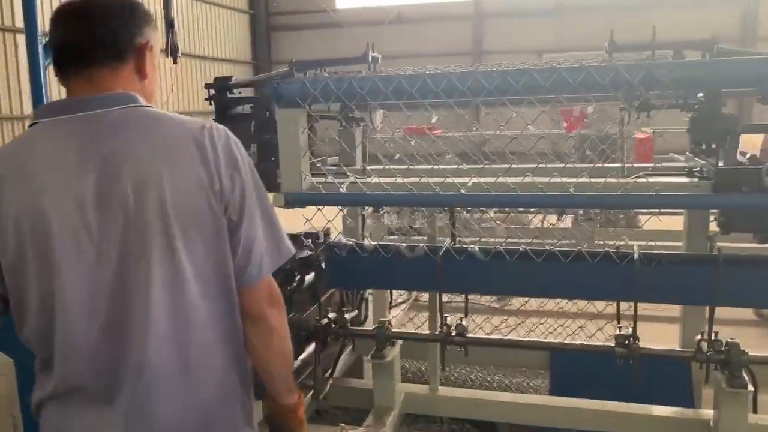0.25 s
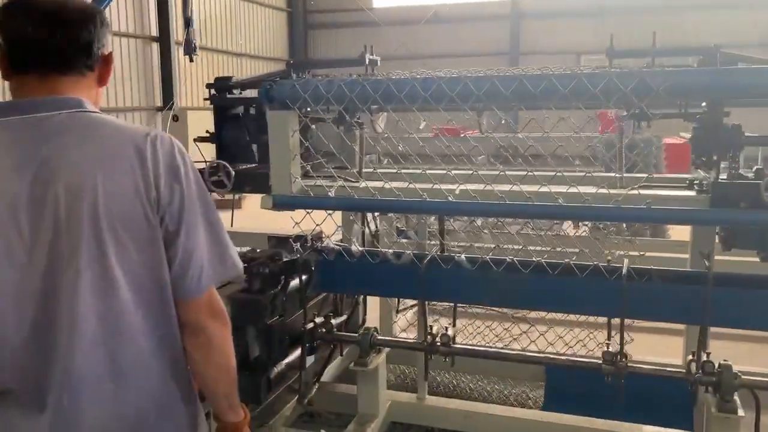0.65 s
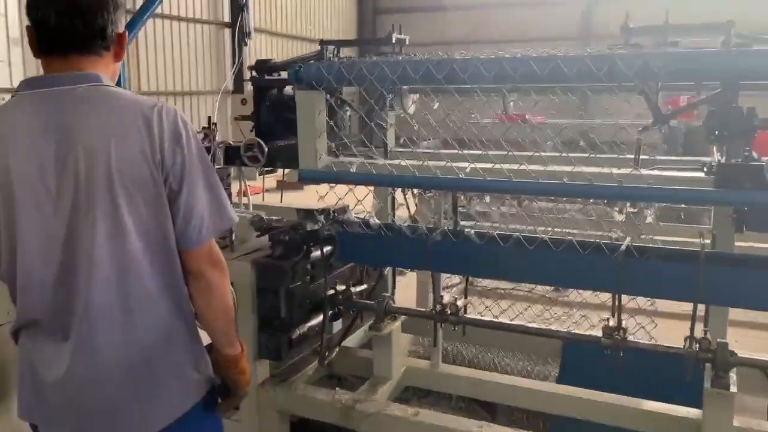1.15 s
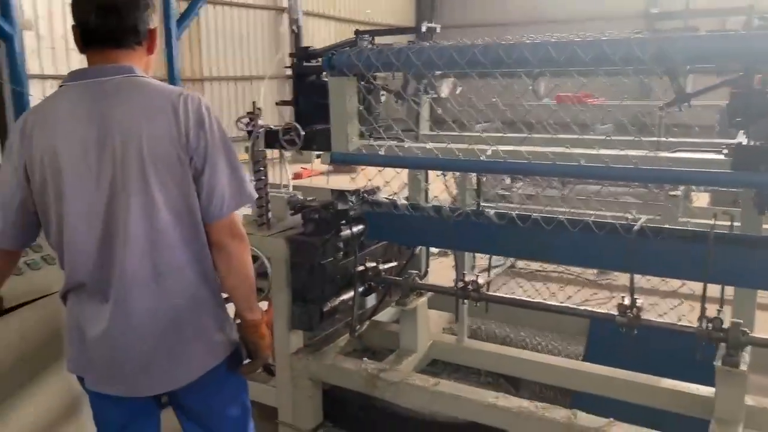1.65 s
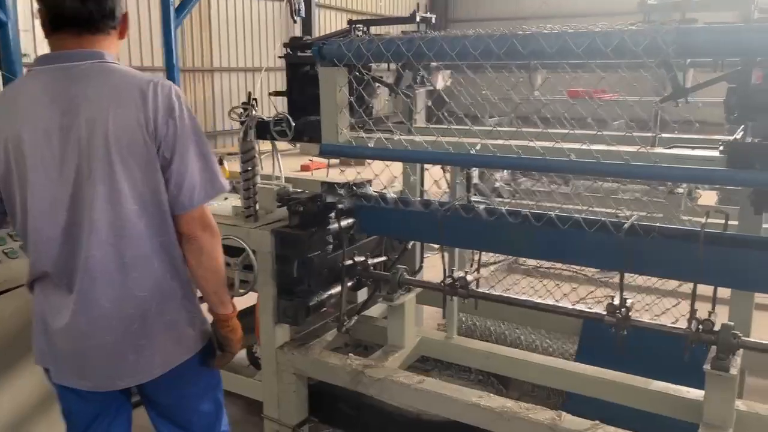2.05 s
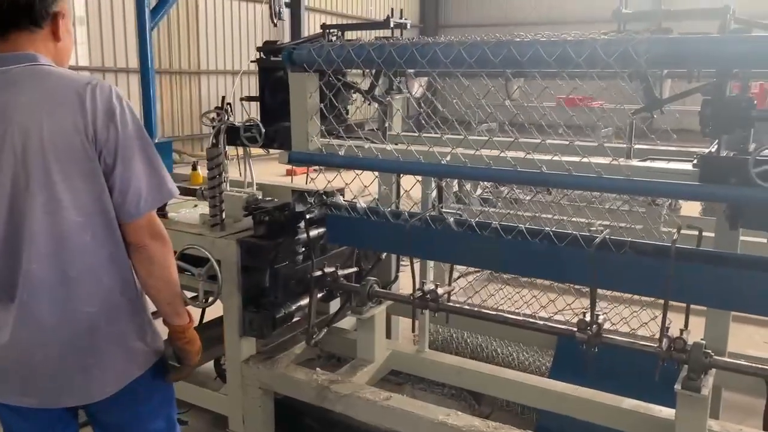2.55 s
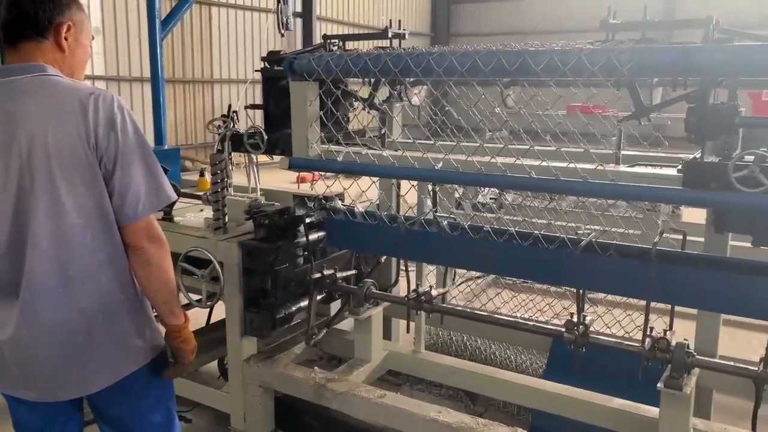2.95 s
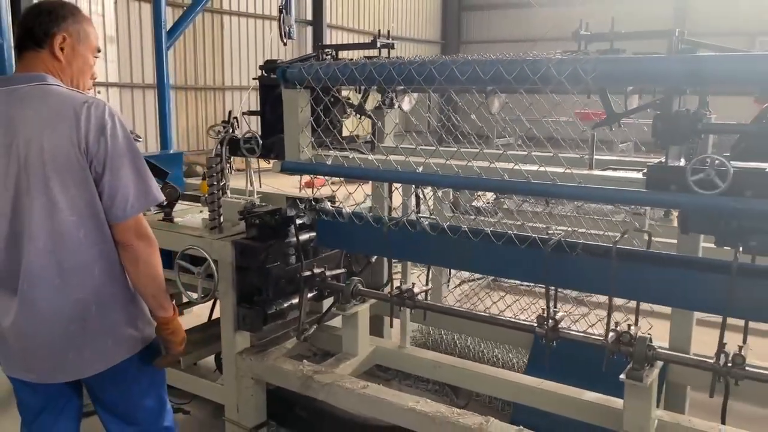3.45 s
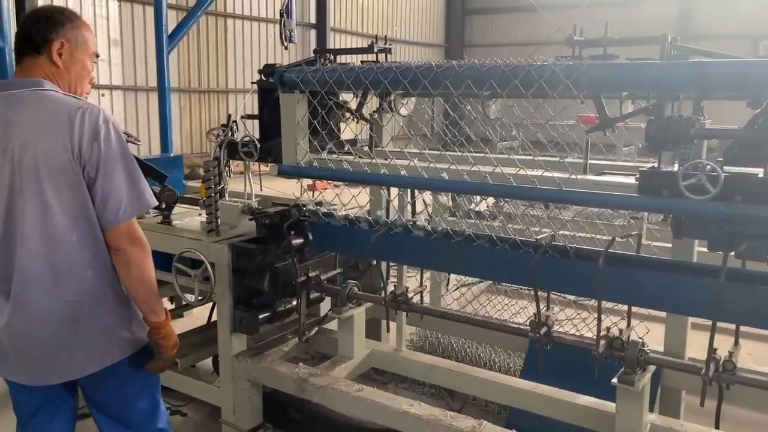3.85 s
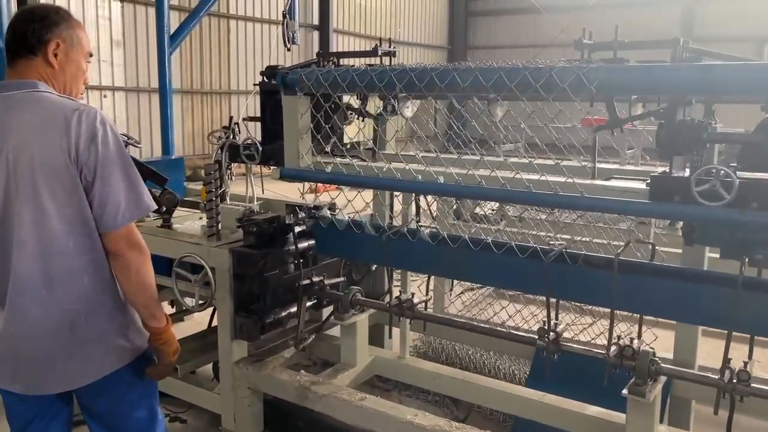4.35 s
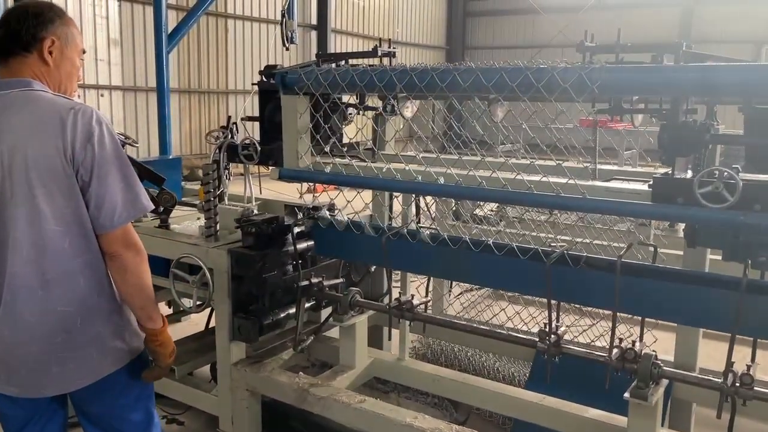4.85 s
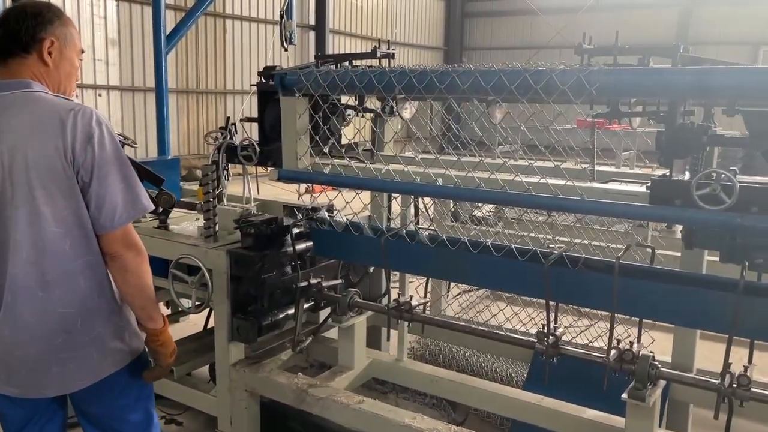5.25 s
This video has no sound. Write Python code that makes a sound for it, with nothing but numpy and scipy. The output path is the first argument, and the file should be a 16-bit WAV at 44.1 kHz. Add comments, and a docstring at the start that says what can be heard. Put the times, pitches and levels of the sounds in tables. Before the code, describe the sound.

Steel wire clatters and jingles on a mesh weaving machine, building up before a heavy cutter knock, over a steady factory roar.

```python
"""The roar of far machines fills a large factory hall; nearby, a wire mesh weaving machine drones and ticks.
Its spinning wire slaps the hanging mesh faster and harder, stops, and a cutter knocks before the drive
picks up again. The steel frame rings low after each jolt and loose links jingle.
Heard in stereo on a handheld recorder."""
import sys
import numpy as np
from scipy import signal
from scipy.fft import rfft, irfft, next_fast_len
from scipy.io import wavfile
from scipy.ndimage import uniform_filter1d, map_coordinates

SR = 44100
rng = np.random.default_rng(int(sys.argv[2]) if len(sys.argv) > 2 else 0)


def output_pcm(signal):
    """Save a mono or channel-first signal as 16-bit PCM at the path in sys.argv[1].

    Samples are clipped to [-1, 1] before scaling.
    """
    pcm = np.clip(np.atleast_2d(signal).T, -1, 1) * 32767
    wavfile.write(sys.argv[1], SR, np.round(pcm).astype(np.int16))


N = 242975

# Spectra of the far machines: freq_hz, level_db
HUM_SPECTRUM = [(20, -40), (40, -22), (52, -3), (62, 0), (69, 7), (78, -6), (100, 2), (140, -51)]
RUMBLE_SPECTRUM = [(60, -40), (90, -15), (115, 0.5), (160, -0.5), (220, 0.5), (300, 0.5), (500, -73)]
ROAR_SPECTRUM = [(120, -17.5), (220, -16), (330, -1), (450, 1), (600, -2.5), (800, -2), (1200, -5),
                 (1600, -6.5), (2000, -12.5), (2400, -11), (3000, -14.5), (5000, -24.5), (7000, -31),
                 (12000, -70)]
# Bands that stand out of the roar: pitch_hz, width_hz, level_db
WHINE_BANDS = [(1250, 70, -3), (1950, 170, 0), (2700, 80, -4), (4250, 70, -2)]
# Course of the roar: time_s, level_db, brightness_db
ROAR_COURSE = [(0.0, -31, -2.5), (0.83, -29.5, -6), (1.3, -31, -2), (2.18, -27.5, -3.5), (2.46, -28.5, -5),
               (2.67, -28.5, 0), (3.04, -28, 0.5), (3.57, -33, -1), (3.87, -31.5, 8), (4.0, -27.5, 5),
               (4.65, -31, 3.5), (5.51, -32.5, 0.5)]
# Shaking of the mesh: time_s, chatter_db, fizz_db
SHAKE_COURSE = [(0.0, -39.5, -44), (0.17, -39, -38), (0.26, -38.5, -43), (1.24, -43, -41),
                (1.75, -33.5, -34.5), (2.18, -32, -34), (2.24, -30.5, -35), (2.93, -28.5, -34),
                (3.21, -29.5, -33), (3.53, -35, -45), (3.74, -40, -52), (3.91, -30, -39),
                (4.05, -36.5, -42), (4.62, -44, -59), (4.86, -56, -48), (5.05, -43.5, -44.5),
                (5.51, -40, -43)]
# Resonances of the mesh: pitch_hz, width_hz, level_db
MESH_MODES = [(1777, 12, -21.5), (2020, 17, -18.5), (1450, 49, -14.5), (2654, 31, -20), (3210, 32, -22),
              (3520, 17, -21), (3940, 20, -20), (4360, 17, -23.5), (5490, 60, -11), (5780, 47, -11.5),
              (6340, 20, -20.5)]
# Spectra of metal contacts: freq_hz, level_db
CHATTER_SPECTRUM = [(700, -15), (1500, 8), (2500, 7), (4500, 7), (6500, -1.5), (9000, -29), (16000, -37)]
FIZZ_SPECTRUM = [(4500, -33), (6500, 5), (8000, 3), (10000, 9.5), (12500, 8.5), (14000, -2), (16000, 13)]
SLAP_SPECTRUM = [(200, -61), (700, -17.5), (1500, -5), (3000, 1.5), (5500, 1.5), (7500, 3.5), (10000, -4.5),
                 (13000, -7), (16000, -9.5)]
KNOCK_SPECTRUM = [(40, -18), (100, -15.5), (350, 0), (600, -1.5), (1000, 6.5), (2000, -0.5), (3000, -5),
                  (6000, -14.5), (15000, -55)]
# Modes of the steel frame: pitch_hz, t60_s (fade caps it at 1 s)
FRAME_MODES = [(437, 0.6), (459, 0.6), (232, 1.2), (369, .7)]
# The drive's drone in each frame mode: level_db, width_hz
DRIVE_BANDS = [(-43.5, 20), (-47, 20), (-44.5, 2.7), (-46.5, 9.1)]
# Jolts to the frame: start_s, then level_db for each mode
FRAME_JOLTS = [(0.1, -49, -45, -31, -45), (0.405, -28, -37, -32, -25.5), (0.7, -41, -44, -35, -36),
               (1.027, -38, -44, -38, -51), (1.299, -26, -36, -47, -34), (1.65, -29, -28, -31, -44),
               (1.93, -23.5, -25, -42, -34), (2.099, -28, -29, -40, -31), (2.251, -38, -37, -37, -26),
               (2.53, -38, -39, -36, -42), (2.688, -39, -24, -33.5, -20.5), (2.819, -32, -44, -41, -41),
               (2.971, -29, -34, -56, -26), (3.198, -36, -40, -36, -26.5), (3.315, -22, -26.5, -49, -31),
               (3.579, -38, -46, -51, -40), (3.854, -29, -45, -48, -24.5), (4.038, -25, -29, -43, -30),
               (4.414, -26.5, -32, -48, -49)]
# Wire against mesh: start_s, level_db, clink_hz, brightness_db, rattle_ms
WIRE_SLAPS = [(0.056, -24, 1700, -14, 18), (0.1006, -18, 4470, -12.5, 5), (0.11, -27, 4350, -17, 6.8),
              (0.198, -22, 3900, -18, 4.2), (0.224, -40, 4300, -17, 5.3), (0.344, -18.5, 6170, -17, 12),
              (0.3695, -21.5, 6080, -13, 16), (0.396, -15, 6360, -19, 10), (0.408, -15.5, 1510, -16, 10),
              (0.426, -33, 4300, -12, 6), (0.495, -29, 2640, -17, 5.5), (0.649, -12, 4670, -13, 6),
              (0.688, -18.5, 1650, -16, 26), (0.7205, -19, 1540, -17, 10), (0.772, -35.5, 1680, -1, 10),
              (0.912, -27, 1710, -12, 10), (0.928, -26, 2500, -10, 14), (0.953, -17.5, 5830, -16, 10),
              (0.972, -16.5, 4110, -14, 21), (0.998, -18.5, 4080, -16, 24), (1.0277, -27, 1810, -8, 11),
              (1.08, -28.5, 2270, -10, 10), (1.211, -29, 2050, -14, 31), (1.2596, -16, 2100, -12, 19),
              (1.278, -16, 5030, -10, 7.5), (1.294, -20, 4240, -16, 6), (1.3393, -11, 1600, -12, 4.7),
              (1.363, -34, 2640, -18, 6), (1.4627, -24, 2800, -17, 10), (1.528, -23.5, 2560, -9, 17),
              (1.5736, -16, 4330, -11.5, 27), (1.604, -20.5, 4130, -17, 35), (1.6389, -16, 1460, -12, 13),
              (1.6592, -12.5, 1590, -10.5, 7.4), (1.7373, -11, 4120, -12, 6), (1.8134, -21, 4230, -11, 10),
              (1.8556, -13, 2170, -14, 31), (1.896, -17.5, 4280, -13, 8.8), (1.91, -16, 4260, -14, 14),
              (1.94, -10.5, 1510, -12, 6), (2.029, -12.5, 3760, -15.5, 10), (2.0532, -12.5, 4330, -16, 7.7),
              (2.08, -13, 2160, -11, 7.8), (2.16, -12.5, 2160, -14, 18), (2.176, -12, 2180, -5, 12),
              (2.187, -13, 4400, -22, 5), (2.206, -19, 4300, -11, 6), (2.237, -15.5, 4340, -10, 4),
              (2.2477, -14, 2570, -11, 6.3), (2.3217, -8.5, 3930, -14.5, 12), (2.3586, -17, 5260, -18, 10),
              (2.381, -18, 2500, -12, 8.4), (2.4084, -8.5, 1980, -7.5, 4.1), (2.419, -27, 1970, -17, 3.4),
              (2.467, -15, 5850, -18, 16), (2.4832, -10.5, 4400, -11, 2.3), (2.493, -11, 4400, -21, 8),
              (2.5336, -10, 2700, -8, 4), (2.54, -14, 2000, -20, 5.2), (2.6219, -8, 2450, -12.5, 6.5),
              (2.683, -19, 2000, -14, 10), (2.6953, -9, 2010, -7.5, 2.7), (2.701, -11.5, 2060, -17, 12),
              (2.7709, -11, 4270, -22, 6.7), (2.7831, -9, 3270, -12.5, 7), (2.801, -16, 4170, -12, 2.5),
              (2.8578, -18, 1950, -12, 15), (2.9245, -7, 2790, -14.5, 5.6), (2.945, -21, 4300, -14, 6),
              (2.9861, -7, 2070, -10, 3.9), (2.993, -12.5, 2060, -20, 4), (3.074, -9, 6030, -13, 8),
              (3.09, -10.5, 5630, -17, 8.5), (3.1082, -11.5, 1780, -20, 8.9), (3.132, -17, 4300, -16, 6),
              (3.159, -17.5, 2660, -2, 9.2), (3.2357, -10, 5500, -12.5, 4.8), (3.25, -16, 4400, -10, 5.4),
              (3.3098, -6, 4390, -8.5, 5.8), (3.329, -9, 2050, -14, 12), (3.3485, -15.5, 3900, -34, 9),
              (3.384, -25, 2700, -24, 6), (3.468, -26, 2660, -32, 6), (3.518, -27, 3850, -10, 8.5),
              (3.691, -24, 3500, -16, 65), (3.753, -23, 1780, -11.5, 38), (3.7861, -17.5, 3400, -10.5, 58),
              (3.846, -8, 1900, -15.5, 2.6), (3.867, -25, 2930, -15, 6), (3.881, -22, 2670, -26, 8),
              (3.906, -30, 3200, -22, 9.2), (3.9346, -26, 2740, -10, 11), (3.999, -29, 2740, -27, 6),
              (4.013, -15.5, 1680, -9.5, 5.3), (4.127, -20.5, 5100, -23, 8.5), (4.181, -38, 2700, -31, 11),
              (4.588, -30.5, 1930, -17, 10), (4.841, -28, 5350, -14, 27), (4.9107, -24, 3380, -11, 11),
              (4.961, -30, 1790, -11, 9.2), (5.0618, -28.5, 1860, -15, 13), (5.1427, -27, 1640, -19, 15),
              (5.1964, -12, 1450, -7, 3.3), (5.2479, -23, 1700, -28, 9.2), (5.461, -24.5, 1630, -15, 14),
              (5.5014, -12.5, 2060, -10, 10)]
# Loose links touching: start_s, level_db, pitch_hz, t60_ms
LINK_JINGLES = [(0.344, -26, 6290, 50), (1.0, -33, 4130, 60), (1.64, -31, 1540, 77), (1.857, -30, 3880, 55),
                (2.028, -25, 3800, 56), (2.03, -28, 5700, 40), (2.162, -29, 3700, 50),
                (2.186, -23, 3880, 50), (2.415, -38, 2090, 140), (2.484, -22, 4350, 55),
                (2.54, -25, 1500, 110), (2.784, -26, 3200, 60), (2.786, -28, 4330, 45),
                (2.801, -25, 4180, 50), (2.926, -28, 2640, 70), (3.317, -26, 7150, 50),
                (3.322, -28, 2130, 70), (3.326, -23, 5700, 54), (3.36, -36, 3900, 70),
                (3.784, -19.5, 7400, 59), (3.79, -29, 4100, 60), (3.795, -32, 3300, 60),
                (3.868, -27, 5670, 160), (3.934, -29, 5430, 100), (4.126, -35, 4860, 200),
                (4.134, -39, 5000, 80), (4.819, -32.5, 3600, 55), (4.82, -33, 5440, 36),
                (4.824, -39, 4400, 50), (4.838, -26, 5500, 37), (4.84, -34, 3600, 45),
                (4.847, -31, 7210, 35), (4.878, -36, 5690, 50), (4.913, -33, 3340, 110),
                (4.914, -37, 7000, 50), (4.944, -36, 5400, 40), (4.962, -35, 3440, 40),
                (5.02, -42, 3660, 50), (5.062, -41, 7000, 50), (5.143, -39, 5470, 70),
                (5.147, -33, 2710, 50), (5.197, -30.5, 4880, 130), (5.247, -38, 5480, 40),
                (5.25, -33, 3660, 40), (5.272, -39, 5520, 65)]
# Blows of cutter and feed: start_s, level_db, rise_ms, t60_ms, sharpness_db, bass_db, clang_db
HEAVY_BLOWS = [(0.408, -16, 2.3, 81, -2, -5, -5), (1.018, -15.5, 3, 44, -17, -9, 0),
               (1.031, -16.5, 2.6, 37, -21, -18, -1.5), (3.314, -17.5, 5.5, 220, -7.5, -16, 8),
               (3.535, -22, 7.4, 120, 0, -2, -8), (3.556, -18.5, 6.7, 92, 0, 3, -2.5),
               (3.574, -13, 6.8, 98, -11.5, 1.5, -0.5), (3.588, -18.5, 6.5, 97, -16, -3, 1),
               (3.608, -15, 6.4, 105, -14, -3, -0.5), (3.822, -19, 8, 99, -7, 6, -14),
               (3.844, -6, 2, 72, 2, -8, -8), (3.849, -6.5, 0.89, 38, 2.5, -8, -6),
               (3.855, -11.5, 4.8, 85, -16, 5, -4.5), (3.869, -10.5, 1.6, 73, -0.5, 8, -4.5),
               (3.889, -13, 2.4, 125, -2, 3, -6), (3.91, -16.5, 3, 200, 2, 0, -4),
               (3.935, -14.5, 17, 184, -13, 10, -6), (5.091, -34, 19, 62, -33, -9, -9),
               (5.2, -16, 12, 110, 3, 1, -3.5)]
# Modes of the cutter block: pitch_hz, level_db, t60_s
CUTTER_MODES = [(71, -19.5, 0.16), (114, -7, 0.088), (160, -5, 0.081), (296, -7, 0.11), (398.6, -3, 0.088),
                (497, -8, 0.061), (740, -7, 0.16), (957, -3, 0.04), (1190, 2, 0.077), (1660, -10, 0.08),
                (2110, -2.5, 0.049), (2700, -6, 0.062)]
# Decay of the hall: freq_hz, t60_s
HALL_DECAY = [(100, 1), (500, 0.32), (2000, 0.58), (6000, 0.88), (14000, 0.22)]
# Likeness of the two channels: freq_hz, coherence (0 to 1)
STEREO_LIKENESS = [(60, 0.99), (200, 0.96), (400, 0.79), (700, 0.31), (1400, 0.15), (1950, 0.66),
                   (2600, 0.37), (3700, 0.32), (6000, 0.41), (7000, 0.88), (8200, 0.99), (10100, 0.98),
                   (11700, 1), (13800, 0.8), (15300, 1)]
# Phase of the left channel against the right: freq_hz, phase_rad
STEREO_PHASE = [(0, 0), (1200, .2), (1550, -1.5), (1800, .1), (3500, 1), (4700, .6), (5700, -1.4),
                (6500, -1.1), (8000, -3.1), (8900, -3.3), (10000, -4.6), (11300, -6.2), (12700, -6.4),
                (13800, -7.6), (14800, -9.2), (16200, -9.4)]
# Level of the left channel over the right: freq_hz, balance_db
STEREO_BALANCE = [(60, -0.5), (110, 0.5), (200, -0.5), (380, 1.5), (700, 0.5), (1290, 0.0), (2380, 1.5),
                  (4400, 6), (8120, 0), (15000, -0.5)]

HUM_DB, RUMBLE_DB = -48, -39
SWELL_S, SWELL_WIDTH_S, SWELL_DB = 1.13, 0.38, 5.5  # the hum swells once
DRIVE_STOP_S, DRIVE_START_S, COAST_S, IDLE_DB = 3.7, 4.88, 0.35, -9  # the drive idles for the cut
TICK_DB, JANGLE_DB, RING_DB = 7, 4, -8  # parts of a slap
FULL_DB, THINS_DB_PER_OCTAVE = 10, -3.5  # a slap's low end thins as its clink gets higher
PLAIN_DB = -16  # brightness at which a slap keeps its plain treble
SWING_CYCLES = 0.77  # the cutter's low modes swing up slowest
TOP_HZ = 15600  # the treble ends here


def amp(db):
    return 10 ** (np.asarray(db) / 20)


def unit(x):
    return x / np.sqrt(np.mean(x ** 2) + 1e-20)


def along(points, hz):
    """Read (freq_hz, value) points on a log axis."""
    f, v = np.transpose(points)
    return np.interp(np.log(hz + 1), np.log(f + 1), v)


def curves(rows):
    """One value per sample for each column after the time."""
    times, *columns = np.transpose(rows)
    return [np.interp(np.arange(N) / SR, times, column) for column in columns]


def wobble(rate):
    """A smooth random curve, rate knots a second."""
    return map_coordinates(rng.standard_normal(int(N * rate / SR) + 4), [np.arange(N) * rate / SR])


def filtered(x, response):
    """Apply a frequency response."""
    n = x.shape[-1]
    m = next_fast_len(n + 8192)
    return irfft(rfft(x, m) * response(np.fft.rfftfreq(m, 1 / SR)), m)[..., :n]


def coloured(x, gain):
    """Shape a burst's spectrum, at rms 1."""
    n = x.shape[-1]
    return unit(irfft(rfft(x) * gain(np.fft.rfftfreq(n, 1 / SR)), n))


def add(track, start_s, sound):
    """Lay a sound into the track."""
    part = track[:, round(start_s * SR):][:, :sound.shape[-1]]
    part += sound[:, :part.shape[-1]]


def fade(t, rise_s, t60_s):
    """Quick rise, exponential fall."""
    return (1 - np.exp(-t / np.clip(rise_s, 1e-4, 1))) * amp(-60 * t / np.clip(t60_s, .01, 1))


def tone(t, hz):
    """Two sines of one pitch at random phases."""
    return np.sin(2 * np.pi * (hz * t + rng.random((2, 1))))


def far_machines():
    """Across the hall, motors and other machines blur into an unsteady hum, rumble and roar."""
    roar_db, bright_db = curves(ROAR_COURSE)
    hum_db = HUM_DB + SWELL_DB * np.exp(-((np.arange(N) / SR - SWELL_S) / SWELL_WIDTH_S) ** 2)
    whine = lambda hz: 1 + sum(amp(db) / (1 + (2 * (hz - pitch) / width) ** 2)
                               for pitch, width, db in WHINE_BANDS)
    layers = [(HUM_SPECTRUM, hum_db, 1.5), (RUMBLE_SPECTRUM, RUMBLE_DB, 1.5), (ROAR_SPECTRUM, roar_db, .8)]
    blur = np.zeros((2, N))
    for spectrum, db, sway_db in layers:
        level = amp(db + sway_db * wobble(11))
        noise = filtered(rng.standard_normal((2, N)), lambda hz: amp(along(spectrum, hz)) * whine(hz))
        blur += level * unit(noise)
    dull = uniform_filter1d(uniform_filter1d(blur, size=20), size=20)  # under about 700 Hz
    return dull + amp(bright_db) * (blur - dull)


def contacts(n, spread_db):
    """Two unrelated streams of tiny contacts, their sizes in clumps of a millisecond."""
    clumps = unit(uniform_filter1d(rng.standard_normal(n), size=40))
    return unit(rng.standard_normal((2, n)) * amp(spread_db * clumps))


def mesh_gain(hz, lift_db):
    """The mesh's resonances lift a few narrow bands."""
    return 1 + sum(amp(db + lift_db) / (1 + ((hz - pitch) / width) ** 2) for pitch, width, db in MESH_MODES)


def mesh_shaking():
    """The links of the hanging mesh keep ticking against each other."""
    chatter_db, fizz_db = curves(SHAKE_COURSE)
    ticks = contacts(N, spread_db=3.5) * amp(1.8 * wobble(40))
    chatter = unit(filtered(ticks, lambda hz: amp(along(CHATTER_SPECTRUM, hz)) * mesh_gain(hz, 9.3)))
    fizz = unit(filtered(ticks, lambda hz: amp(along(FIZZ_SPECTRUM, hz))))
    return amp(chatter_db) * chatter + amp(fizz_db) * fizz


def steel_frame():
    """The frame's low modes swell and die after each jolt, and drone under the drive."""
    out, t = np.zeros((2, N)), np.arange(32768) / SR
    for start_s, *levels in FRAME_JOLTS:
        for (hz, t60_s), db in zip(FRAME_MODES, levels):
            add(out, start_s, amp(db) * fade(t, 0.022, t60_s) * tone(t, hz))
    out *= amp(-1.5 + 3 * np.array([wobble(35), wobble(35)]))  # loose joints roughen the ring
    drive_db, = curves([(DRIVE_STOP_S - COAST_S, 0), (DRIVE_STOP_S + COAST_S, IDLE_DB),
                        (DRIVE_START_S - COAST_S, IDLE_DB), (DRIVE_START_S + COAST_S, 0)])
    for (pitch, _), (db, width) in zip(FRAME_MODES, DRIVE_BANDS):
        drone = filtered(rng.standard_normal((2, N)), lambda hz: 1 / (1 + ((hz - pitch) / width) ** 2))
        out += amp(db + drive_db) * unit(drone)
    return out


def wire_slaps():
    """The wire hits with a sharp tick and a rattle runs along the mesh; one link rings above the rest."""
    out, t = np.zeros((2, N)), np.arange(6144) / SR
    for start_s, db, clink_hz, bright_db, rattle_ms in WIRE_SLAPS:
        full_db = FULL_DB + THINS_DB_PER_OCTAVE * np.log2(clink_hz / MESH_MODES[0][0])
        tilt = [(1200, full_db), (3000, 0), (7000, 0), (11000, bright_db - PLAIN_DB)]
        touch = contacts(len(t), spread_db=3)
        # each slap finds a new comb of link resonances
        links_db = 3.2 * unit(uniform_filter1d(rng.standard_normal(len(t) // 2 + 1), size=14))
        colour = lambda hz: amp(along(SLAP_SPECTRUM, hz) + along(tilt, hz) + links_db)
        clink = lambda hz: 1 + 1.1 / (1 + ((hz - clink_hz) / 90) ** 2)
        burst = coloured(touch, lambda hz: colour(hz) * mesh_gain(hz, 2.7) * clink(hz))
        low = uniform_filter1d(burst, size=4)
        after_s = np.maximum(t - rattle_ms / 1000, 0)  # once the rattle ends, the treble dies first
        body = low * amp(-60 * after_s / 0.3) + (burst - low) * amp(-60 * after_s / 0.06)
        rise_s = np.clip(0.16 * rattle_ms, .3, 2.2) / 1000
        snap = fade(t, rise_s / 2, t60_s=0.02)  # the first contact
        rattle = (snap + fade(t, rise_s, t60_s=0.64)) * body
        fizz = coloured(touch, lambda hz: amp(along(FIZZ_SPECTRUM, hz)))
        tick = amp(bright_db + TICK_DB) * fade(t, rise_s / 3, t60_s=0.025) * fizz
        ring = amp(RING_DB) * fade(t, 0.0031, t60_s=0.08) * tone(t, clink_hz)
        add(out, start_s, amp(db - 7.5) * (tick + rattle + ring + amp(JANGLE_DB) * mesh_jangle(t)))
    return out


def mesh_jangle(t):
    """The whole mesh rings out, at new strengths and a little off pitch for each slap."""
    chance = rng.standard_normal((2, len(MESH_MODES)))
    ring = sum(amp(db + 4 * strength) * np.exp(-np.pi * width * t) * tone(t, hz * (1 + .012 * detune))
               for (hz, width, db), strength, detune in zip(MESH_MODES, *chance))
    return (1 - np.exp(-t / .003)) * ring


def link_jingles():
    """Each loose link rings briefly at its own pitch, roughened as it keeps touching its neighbours."""
    out, t = np.zeros((2, N)), np.arange(SR // 8) / SR
    for start_s, db, hz, t60_ms in LINK_JINGLES:
        ring = amp(db + 6) * fade(t, 0.0023, t60_ms / 1000) * tone(t, hz)
        roughness = uniform_filter1d(contacts(len(t), spread_db=1.5), size=80) * np.sqrt(80)
        add(out, start_s, ring * (1 + 0.7 * roughness))
    return out


def cutter_knocks():
    """Heavy parts meet: a broad blow and the clang of the cutter block, duller when the contact is soft."""
    out, t = np.zeros((2, N)), np.arange(16384) / SR
    for start_s, db, rise_ms, t60_ms, sharp_db, bass_db, clang_db in HEAVY_BLOWS:
        rise_s = rise_ms / 1000
        tilt = [(220, bass_db), (500, 0), (1000, sharp_db)]
        colour = lambda hz: amp(along(KNOCK_SPECTRUM, hz) + along(tilt, hz)) * mesh_gain(hz, 5.2)
        blow = fade(t, rise_s, t60_ms / 1000) * coloured(contacts(len(t), spread_db=2), colour)
        clang = 0
        for hz, mode_db, t60_s in CUTTER_MODES:
            level = amp(mode_db + along(tilt, hz) + 1.3 * rng.standard_normal())
            swing = np.sin(2 * np.pi * hz * t + 3 * rng.standard_normal((2, 1)))
            clang += level * fade(t, rise_s + SWING_CYCLES / hz, t60_s) * swing
        add(out, start_s, amp(db - 1) * (blow + amp(clang_db) * clang))
    return out


def hall(x):
    """The hall answers about 14 ms late, each frequency dying at its own speed."""
    hz, t, noise = signal.stft(rng.standard_normal((2, SR)), SR, nperseg=256)
    tail = signal.istft(noise * amp(-60 * t / along(HALL_DECAY, hz)[:, None]), SR, nperseg=256)[1]
    delayed = np.pad(x, ((0, 0), (600, 0)))
    return signal.fftconvolve(delayed, tail / np.linalg.norm(tail[0]), axes=1)[:, :N]


def scene():
    """The sound beside the machine, in two rows: what left and right share and what parts them."""
    knocks, slaps, jingles = cutter_knocks(), wire_slaps(), link_jingles()
    echo = hall(amp(-9.5) * knocks + amp(-12) * slaps)
    return knocks + slaps + jingles + echo + steel_frame() + mesh_shaking() + far_machines()


def stereo_image(hz):
    """Gain and phase of the shared sound and of the parting sound in the left and right channels."""
    angle = np.arccos(np.clip(along(STEREO_LIKENESS, hz), 0, 1)) / 2
    side = np.array([[1], [-1]])
    phase_rad = np.interp(hz, *np.transpose(STEREO_PHASE))
    skew = amp(side * along(STEREO_BALANCE, hz) / 2) * np.exp(.5j * side * phase_rad)
    return skew * np.cos(angle), skew * side * np.sin(angle)


def record(dry):
    """Spread to left and right; a soft limit rounds off the loudest hits and the top treble is cut."""
    shared = filtered(dry[0], lambda hz: stereo_image(hz)[0])
    parting = filtered(dry[1], lambda hz: stereo_image(hz)[1])
    pair = shared + parting
    rounded = pair / (1 + np.abs(pair / .9) ** 5) ** (1 / 5)
    return filtered(rounded, lambda hz: amp(-np.clip(hz - TOP_HZ, 0, 800) / 8))


dry = scene()
out = record(dry)
output_pcm(out)
```